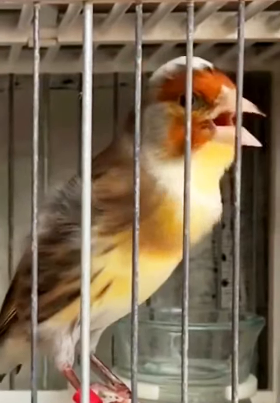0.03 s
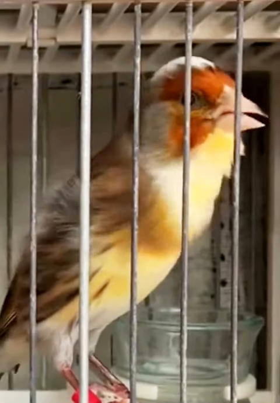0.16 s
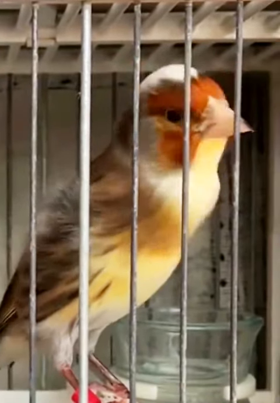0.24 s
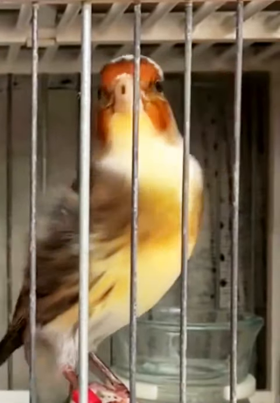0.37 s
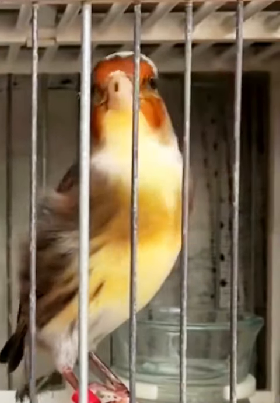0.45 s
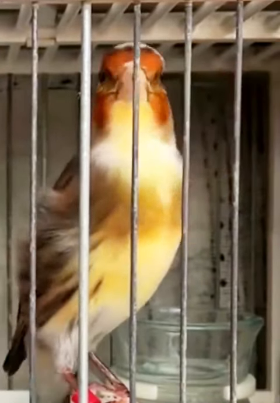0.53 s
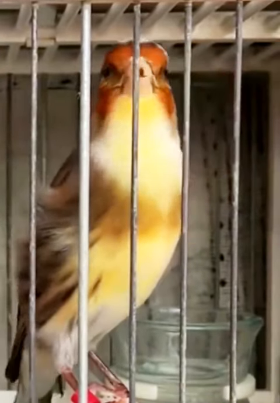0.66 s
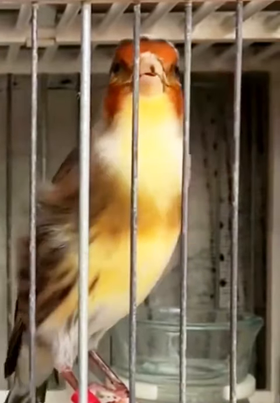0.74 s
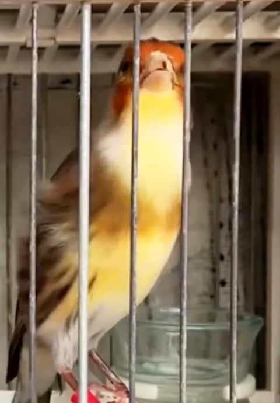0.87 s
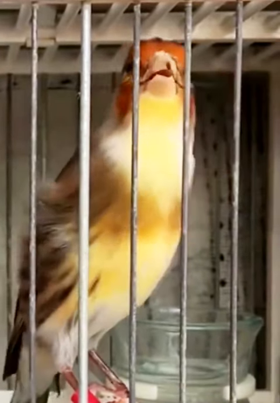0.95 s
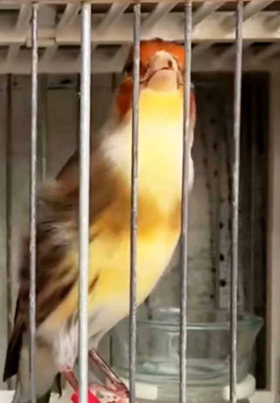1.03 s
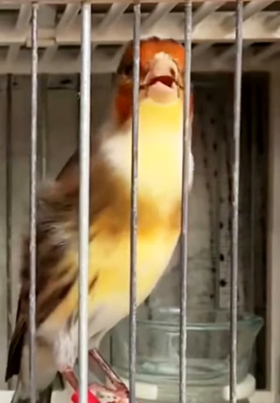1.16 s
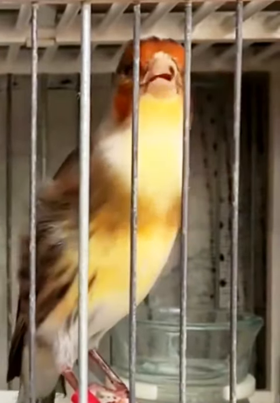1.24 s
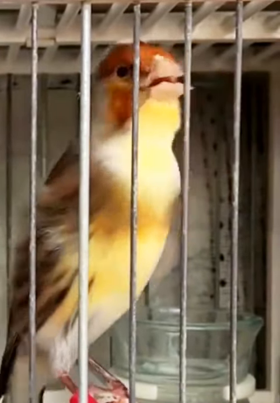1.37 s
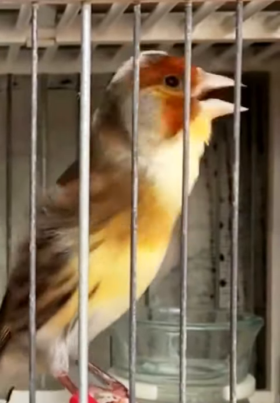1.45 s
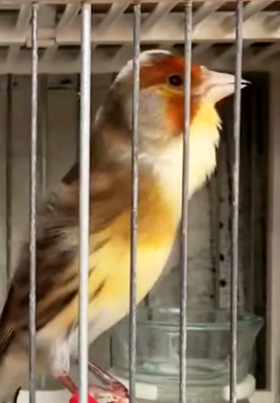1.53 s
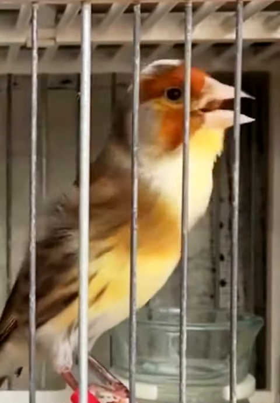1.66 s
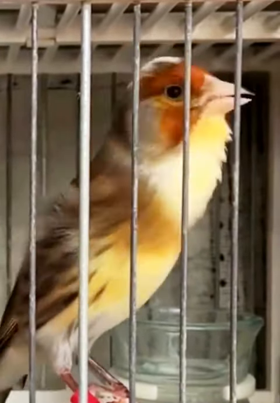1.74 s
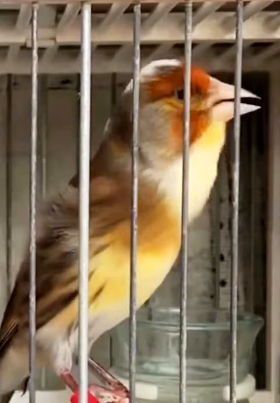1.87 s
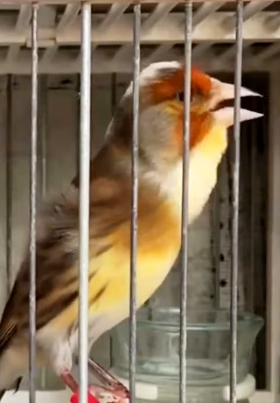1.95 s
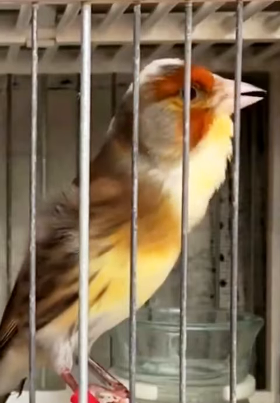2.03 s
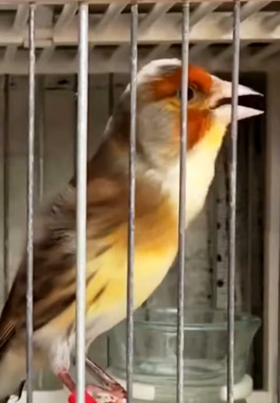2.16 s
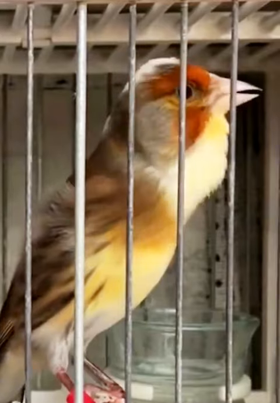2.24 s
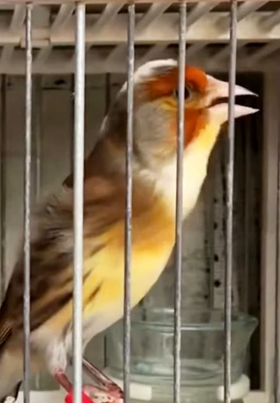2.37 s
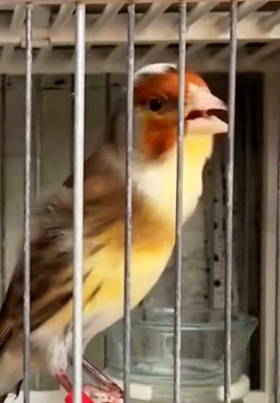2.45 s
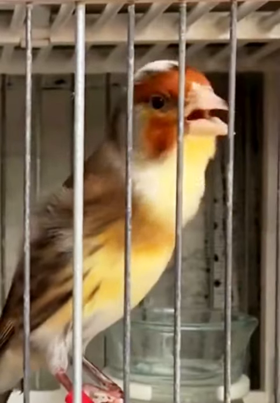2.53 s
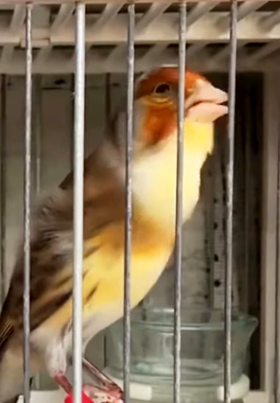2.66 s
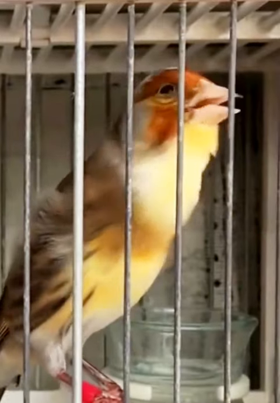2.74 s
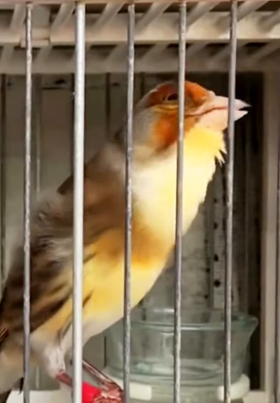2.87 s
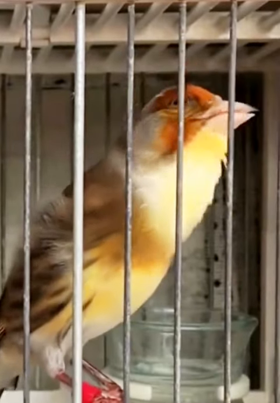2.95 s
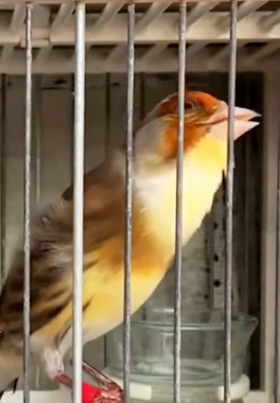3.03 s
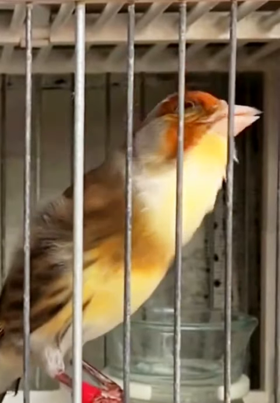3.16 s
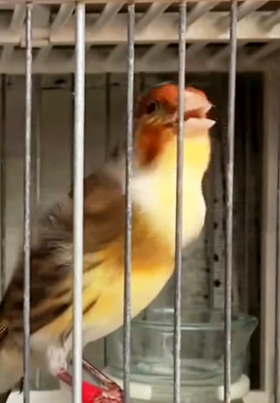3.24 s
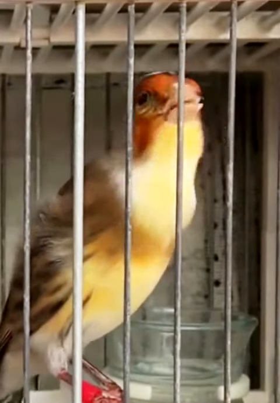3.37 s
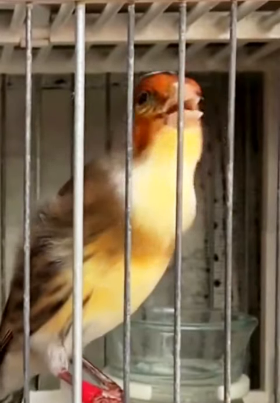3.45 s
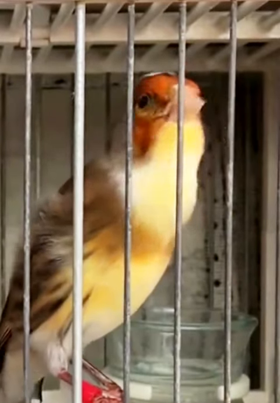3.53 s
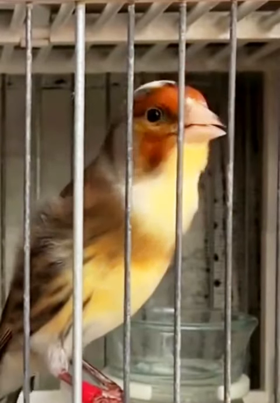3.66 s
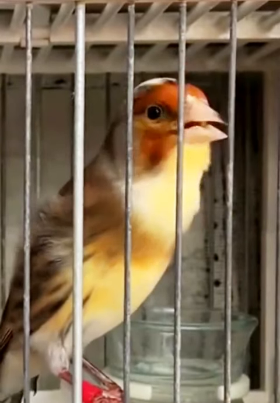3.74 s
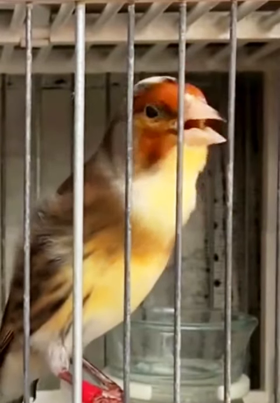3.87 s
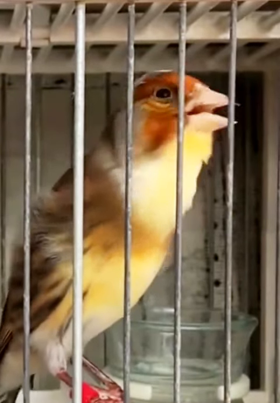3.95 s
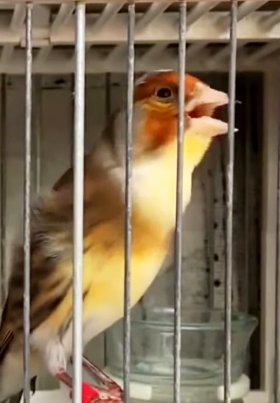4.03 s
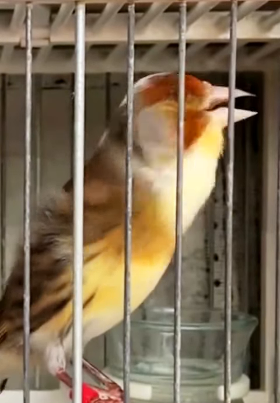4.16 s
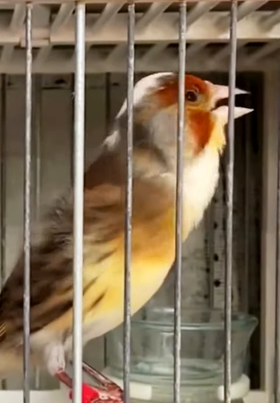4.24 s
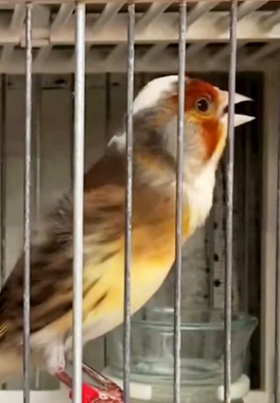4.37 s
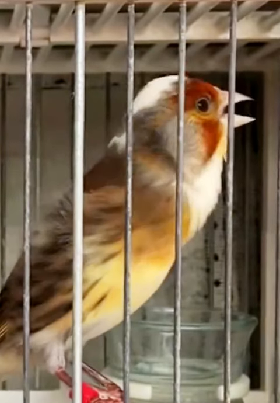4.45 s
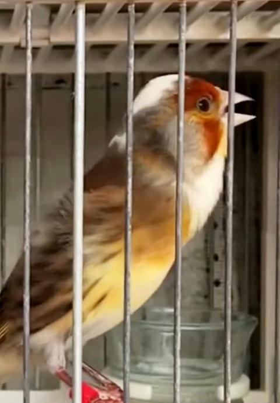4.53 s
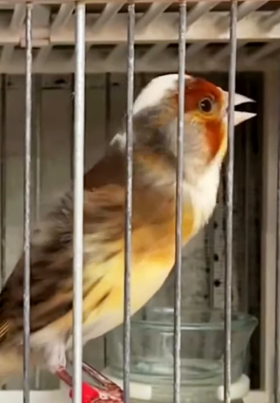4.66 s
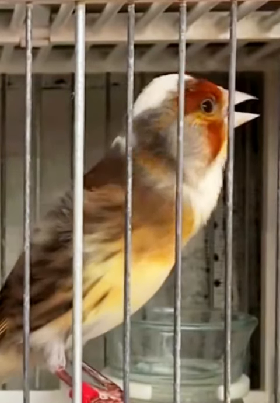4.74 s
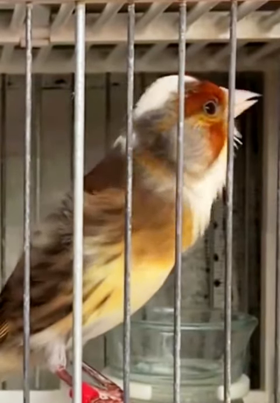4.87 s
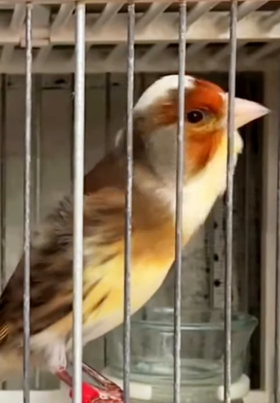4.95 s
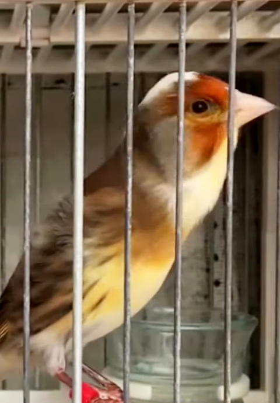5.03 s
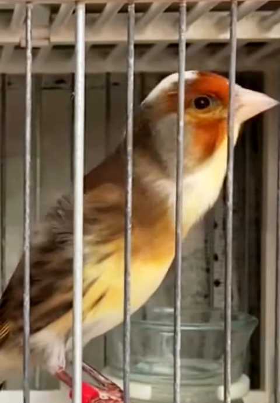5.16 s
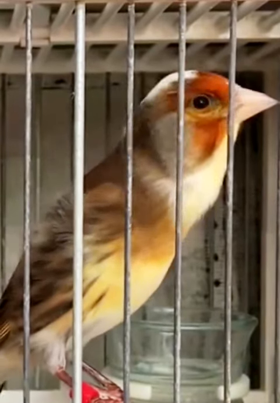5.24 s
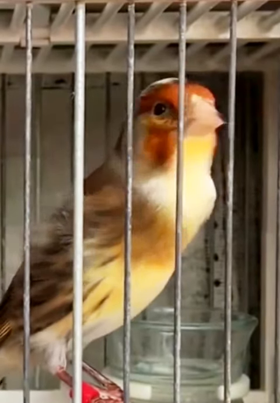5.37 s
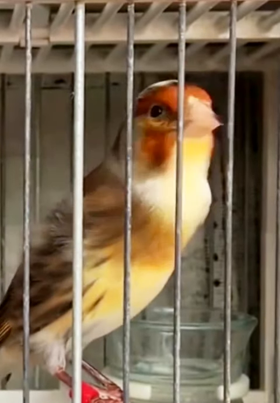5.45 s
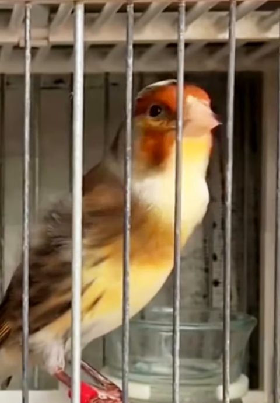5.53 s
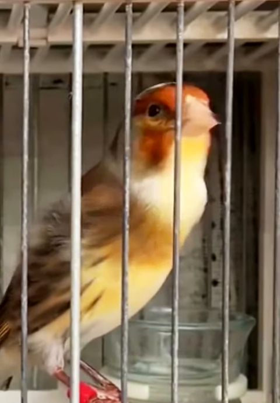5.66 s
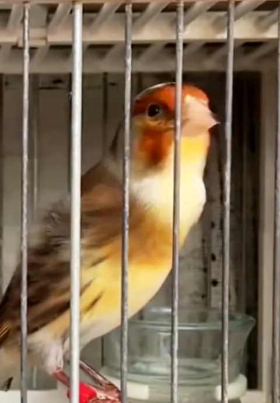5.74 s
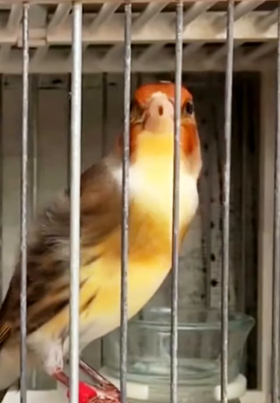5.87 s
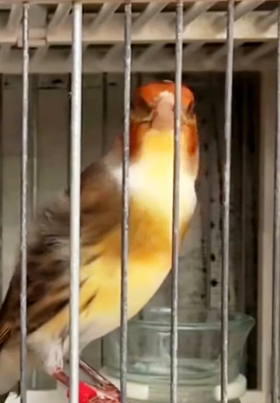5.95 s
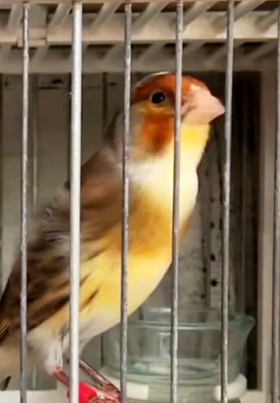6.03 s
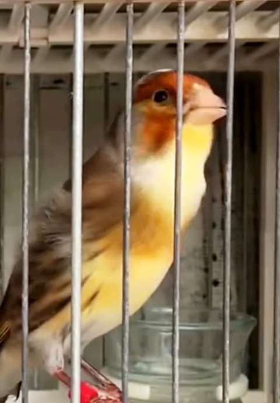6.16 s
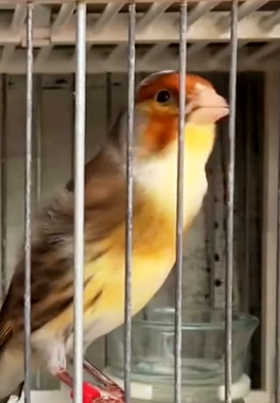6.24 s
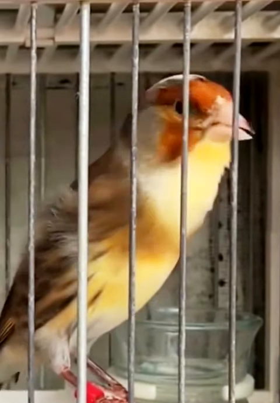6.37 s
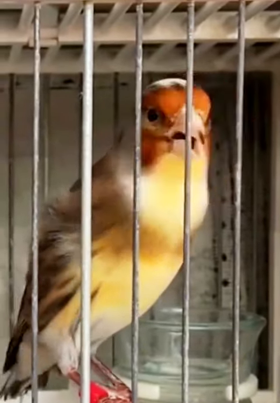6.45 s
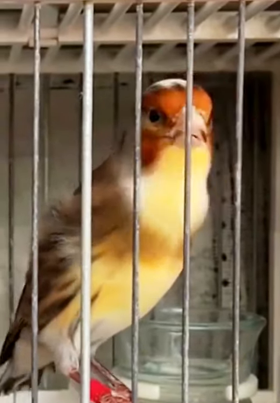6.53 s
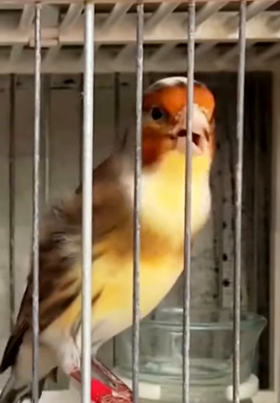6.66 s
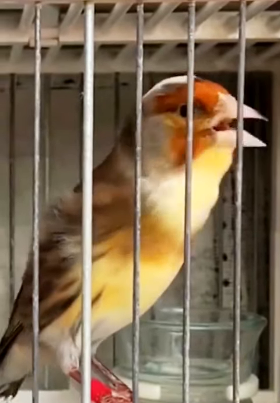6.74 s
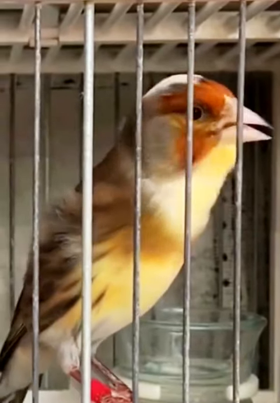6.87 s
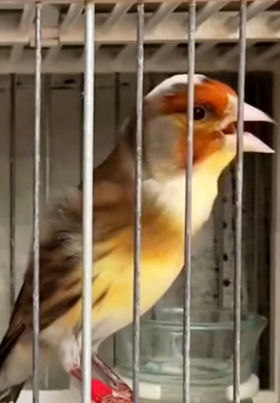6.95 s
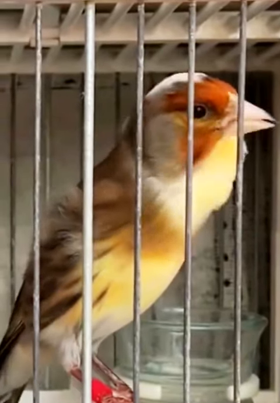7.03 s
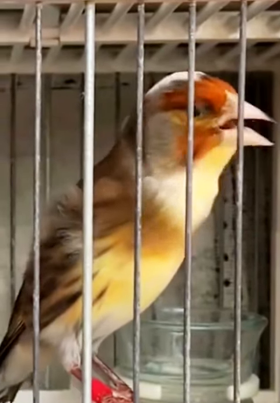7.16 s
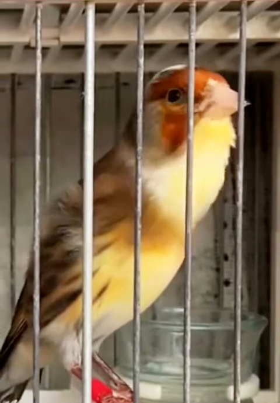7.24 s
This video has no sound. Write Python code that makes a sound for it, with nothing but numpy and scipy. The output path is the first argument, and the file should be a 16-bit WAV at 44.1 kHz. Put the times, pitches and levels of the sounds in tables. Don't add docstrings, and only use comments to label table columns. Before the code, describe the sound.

A small finch sings loudly and very close to the microphone in a small hard room. Short clear whistles with tiny high chirps repeat about five times a second, drop in pitch and flutter, then turn into faster chips and sharp downward sweeps. A falling throbbing buzz ends the phrase. After over a second of near quiet with faint distant chirps, the whistled song starts again. Low air rumble and thin hush lie beneath.

```python
import sys
import numpy as np
from scipy import signal
from scipy.fft import rfft, irfft, next_fast_len
from scipy.io import wavfile
from scipy.ndimage import uniform_filter1d

SR = 44100
rng = np.random.default_rng(int(sys.argv[2]) if len(sys.argv) > 2 else 0)


def voltage_ratio(level):
    return 10 ** (np.asarray(level, float) / 20)


def store_pcm(level_fs):
    pcm = np.round(np.clip(level_fs, -1, 1) * 32767).astype(np.int16)
    wavfile.write(sys.argv[1], SR, np.atleast_2d(pcm).T)


N = 321930
T = np.arange(N) / SR

# [f/Hz, density/dB]
RUMBLE = [(20, -31), (45, -5), (80, 0), (200, -8), (400, -22), (800, -37)]
# [t/s, peak level/dB]
PUFFS = [(.8, -47), (.98, -44), (1.118, -41), (1.209, -38), (1.599, -48), (1.779, -35), (1.869, -44.5),
         (2.079, -41), (2.279, -45), (2.43, -40), (2.54, -45.5), (2.899, -47), (5.29, -43), (5.65, -51),
         (5.95, -47.5), (6.5, -35), (6.6, -40.5), (6.708, -37), (7.18, -49)]
# [f/Hz, density/dB]
ROOM_HUSH = [(150, -11.5), (300, -10), (500, -18.5), (2300, -23), (3800, -15), (5900, -24.5), (6600, -35),
             (15500, -39.5)]
# [t/s, width/s, sinking/dB]
DUCKS = [
    (5.17, 0.2, 5),
    (5.92, .1, 2.5),
]
# [t/s, length/s, first f/Hz, last f/Hz, rms level/dB]
FAR_COOS = [
    (0.034, .73, 1289, 1418, -56),
    (0.05, .5, 2000, 2120, -65),
    (0.057, .46, 1630, 1640, -57.5),
    (5.403, .05, 3760, 3600, -44),
    (5.78, .08, 3350, 2800, -51),
    (6.951, .3, 514, 618, -58),
    (6.98, .3, 590, 560, -59),
    (4.6, .25, 510, 500, -65),
]
FAR_CHATTER = [
    (0.633, .082, 3630, 2600, -48.5),
    (5.432, .1, 3400, 3020, -45),
    (5.58, .075, 4100, 2900, -55),
    (6.14, .14, 3424, 2780, -46.5),
    (4.87, .09, 2900, 2800, -52),
    (4.08, .11, 3100, 2900, -49),
]

# [low f/Hz, high f/Hz]
HAZE_BANDS = [(2500, 4100), (4100, 6400)]
# [low f/Hz, whistle f/Hz, whistle share 0-1]
REBUILT_BANDS = [(6400, 6718, .1), (7200, 7655, .1), (8000, 8442, .1), (8900, 9474, 0), (10300, 11455, .1),
                 (12060, 12576, .1), (13100, 13609, .2), (14200, 14600, .05), (14900, 15331, .3)]
REBUILT_DB = [-6, -2.5, -10.5, -12, 2, -3, 3.5, 6, 4.5]
# [order, low f/Hz, high f/Hz]
OVERTONES = [(2, 6400, 7000), (2, 7000, 9200), (2, 9400, 12300), (2, 12300, 15600), (3, 13500, 15600),
             (4, 12700, 14000), (3, 8500, 9900), (3, 12100, 13300)]
OVERTONE_DB = [-42, -30, -24, -24, -24.5, -36, -33, -37]
# [from t/s, to t/s, f/Hz, level/dB]
HANGING = [
    (3.77, 4.57, 12576, -27),
    (1.77, 2.42, 15331, -28),
    (3.77, 4.15, 8442, -33),
]

# [t/s, length/s, rms level/dB, whistle share 0-1]
HIGH = [(1.107, .02, -31.5, .41), (1.301, 0.043, -18.5, .89), (1.34, .016, -31, .97),
        (1.551, 0.026, -16.5, 0.94), (1.783, 0.02, -28.5, .05), (1.807, .04, -18, 0.95),
        (2.041, .02, -26.5, .13), (2.064, 0.027, -18.5, .83), (2.295, 0.017, -26, .05),
        (2.307, .035, -20, .48), (3.77, .024, -18.5, .39), (3.831, 0.02, -28, .05),
        (3.851, .023, -16.5, .41), (3.913, .021, -26, .05), (3.936, .029, -20, .05),
        (4.012, 0.021, -16.5, .3), (4.074, 0.024, -22, .33), (4.164, .027, -25, .18),
        (4.241, 0.03, -20, .52), (4.326, .026, -20.5, .18), (4.4, 0.017, -22.5, .21),
        (4.476, .03, -27, .59), (6.614, 0.022, -27.5, .73), (6.637, 0.03, -21.5, .71),
        (6.869, 0.041, -25.5, .95), (7.098, .047, -23.5, 0.97)]
HIGHEST = [
    (0.702, 0.014, -39, 0.2),
    (0.89, .022, -34.5, 0.54),
    (4.563, .059, -25, .5),
    (6.184, 0.01, -32.5, 0.33),
    (6.407, .022, -32.5, .23),
]
# [t/s, pitch f/Hz, rms level/dB, throb f/Hz, throb depth 0-1]
BUZZ = [
    (4.647, 5606, -24, 185.7, 0.6),
    (4.685, 5000, -16.5, 198.6, 0.32),
    (4.705, 4550, -12.5, 203.1, 0.05),
    (4.73, 4388, -14.5, 206.5, 0.2),
    (4.741, 4298, -27.5, 148, 0.56),
    (4.748, 3883, -20, 128.9, 0.4),
    (4.81, 3052, -19.5, 139.2, 0.46),
    (4.87, 2624, -27, 150.4, 0.77),
    (4.89, 2330, -46, 162, 0.05),
]

# [t/s, length/s, settled f/Hz, level near the end/dB, lead-in level/dB]
WHISTLES = [(0.547, 0.065, 4312, -7.5, -18), (0.749, 0.069, 4245, -3.5, -17.5),
            (0.958, 0.076, 4260, -2.5, -17), (1.158, 0.081, 4043, -3.5, -19.5),
            (1.395, 0.092, 3854, -10.5, -14.5), (6.243, 0.087, 4288, -4.5, -17.5),
            (6.481, 0.073, 4267, -2, -13), (6.7, 0.11, 3917, -14.5, -9.5), (6.95, 0.093, 3914, -16, -8.5)]
WARBLES = [(1.632, 0.1, 3560, -6.5, -19), (1.882, 0.095, 3560, -5.5, -22.5), (2.141, 0.1, 3538, -8, -19.5),
           (7.184, 0.093, 3552, -6.5, -18.5)]
SLIDES = [(3.118, 0.077, 4198, -3.5, -11.5), (3.282, 0.097, 4193, -4, -16), (3.472, 0.08, 4224, -5, -17),
          (3.65, 0.086, 4240, -5.5, -18.5)]
HOOTS = [(3.058, 0.053, 3566, -7.5, -23.5), (3.218, 0.042, 3387, -6, -21),
         (3.405, 0.047, 3380, -5.5, -25.5), (3.584, 0.045, 3376, -6.5, -21)]
DROPS = [(2.434, 0.039, 4783, -8.5, -22), (2.523, .034, 4760, -7, -22), (2.611, .040, 4703, -7, -22),
         (2.697, 0.039, 4635, -5, -22), (2.785, .036, 4795, -5, -22), (2.879, .034, 4804, -6, -22),
         (2.976, .044, 4930, -7, -22)]
CRACKS = [(4.091, .024, 4900, -11.5, -20), (4.180, .022, 4900, -7.5, -20), (4.259, .021, 4810, -8.5, -20),
          (4.331, .021, 4880, -7.5, -20), (4.403, .024, 4916, -7.5, -19.5), (4.490, .02, 4890, -11.5, -20)]
# (first f/Hz, f/Hz where the lead-in hands over, glide share of the length,
# overlap/s, attack/s, growth/dB, release/s)
WHISTLE, WARBLE = (2900, 3763, .26, .0067, .013, 4.5, .0082), (2780, 3140, .26, .018, .025, 12, .0074)
SLIDE, HOOT = (5355, 4890, .24, .014, .018, 1, .012), (2400, 2825, .42, .002, .021, .6, .01)
DROP, CRACK = (5950, 5350, .32, .15, .004, -4, .009), (6500, 5900, .5, .24, .0025, -12.5, .008)

# [t/s, length/s, last f/Hz, peak level/dB]
FLICKS = [(0.637, .018, 6240, -22.5), (0.835, .021, 6220, -22.5), (1.047, .023, 6030, -16),
          (1.769, .006, 5600, -12), (2.014, .007, 5600, -16), (2.269, .008, 5600, -17),
          (6.112, .016, 6180, -20), (6.348, .019, 5984, -19), (6.57, .017, 6090, -16.5)]
CHIRPS = [(1.267, .0051, 5300, -7), (1.505, .0064, 5430, -5), (6.827, .008, 5406, -8.5),
          (7.064, .009, 5440, -9), (7.296, .008, 4897, -6)]
TAPS = [(1.764, 0.004, 4300, -5), (2.009, 0.005, 4233, -5), (2.265, 0.0037, 4360, -3),
        (3.021, 0.013, 4400, -15)]
SWOOPS = [(0.711, 0.023, 5830, -14.5), (0.911, 0.029, 5730, -16.5), (1.12, 0.031, 5620, -8.5),
          (1.339, 0.021, 5205, -2.5), (1.568, 0.035, 5053, -6.5), (1.836, 0.029, 4863, -6.5),
          (2.089, 0.029, 4925, -4), (2.343, 0.026, 4956, -5), (6.195, 0.025, 5830, -15),
          (6.424, 0.028, 5696, -11.5), (6.66, 0.022, 5324, -6), (6.897, 0.038, 5077, -4.5),
          (7.131, 0.032, 5040, -5.5)]
DIPS = [(2.402, 0.005, 2750, -8), (2.49, 0.006, 2600, -11), (2.578, 0.006, 2690, -12),
        (2.666, 0.005, 2800, -9), (2.755, 0.006, 2550, -14.5), (2.844, .006, 2747, -12),
        (2.938, 0.008, 2614, -16)]
LIFTS = [(-.028, .1, 3738, -5.5), (2.418, .015, 3700, -5.5), (2.505, 0.017, 3740, -9),
         (2.594, 0.017, 3706, -9.5), (2.679, .013, 3807, -11), (2.771, 0.0079, 3745, -9.5),
         (2.859, .021, 3736, -7.5), (2.957, .021, 3700, -5.5)]
OPENERS = [(6.068, 0.019, 4240, -8.5)]
SWEEPS = [(3.778, .024, 4980, -5.5), (3.856, .025, 4910, -5.5), (3.946, .022, 4900, -6.5),
          (4.016, .026, 4910, -6)]
PIPS = [(-.006, .016, 4400, -11.5), (3.264, 0.011, 3490, -16), (3.455, 0.012, 3453, -17),
        (3.634, 0.01, 3497, -14.5), (3.805, 0.02, 4215, -2.5), (3.881, .023, 4178, -4),
        (3.97, 0.019, 4182, -3), (4.045, 0.022, 4217, -6), (4.121, .026, 4203, -11.5),
        (4.206, .024, 4184, -11.5), (4.284, 0.032, 4173, -16), (4.356, .027, 4167, -14.5),
        (4.432, 0.032, 4153, -17.5), (4.511, 0.042, 4190, -18.5), (4.57, .07, 4190, -34),
        (6.8, .13, 3920, -33), (7.018, .014, 4023, -12)]
FLICK, CHIRP, TAP = (4348.5, 4.5, 1.16, -2.5, .62), (4326.5, .58, 1.68, 2.5, 1.25), (4747, 2.5, 1.5, -4.5, 1.3)
SWOOP, DIP, LIFT = (6980, 5.5, 1.51, 270, 1.37), (3649, 3, 1.36, 0, .7), (3090, 2.3, 1.17, .5, 1.05)
SWEEP, PIP, OPENER = (6760, 3, 1.15, .99, .85), (None, 1.1, 1.05, 0, .94), (3749, 3, .9, 0, 1.1)

FRAME, FRAME_START = 2048, 807


def noise(shape):
    hz, db = np.transpose(shape)
    f = np.fft.rfftfreq(N, 1 / SR) + 1
    gain = voltage_ratio(np.interp(np.log(f), np.log(hz), db))
    x = irfft(rfft(rng.standard_normal(N)) * gain, N)
    return x / x.std()


def band(x, lo_hz, hi_hz):
    return signal.sosfiltfilt(signal.butter(4, [lo_hz, hi_hz], "band", fs=SR, output="sos"), x)


def walk(rate, n=N):
    k = int(SR / rate)
    steps = np.repeat(rng.standard_normal(n // k + 1), k)
    return 1.3 * uniform_filter1d(uniform_filter1d(steps, k), k)[:n]


def span(start, length):
    at = slice(max(int(start * SR), 0), min(int((start + length) * SR), N))
    return at, np.clip((T[at] - start) / length, 0, 1)


def ramp(u):
    return np.sin(np.pi / 2 * np.clip(u, 0, 1)) ** 2


def tone(hz):
    return np.exp(2j * np.pi * np.cumsum(hz) / SR)


def hiss(hz, width_hz):
    slow = walk(width_hz, len(hz)) + 1j * walk(width_hz, len(hz))
    return (slow * tone(hz)).real / np.std(slow.real)


def hold(power, size):
    first = size - FRAME_START % size
    blocks = np.pad(power, (first, size - (N + first) % size)).reshape(-1, size)
    cells = np.repeat(blocks.mean(axis=1), size)
    return uniform_filter1d(cells[first:first + N], size=90) + 1e-14


def patchy(x, spread_db):
    _, _, cells = signal.stft(x, nperseg=1024)
    chance = rng.standard_normal((cells.shape[0] // 8 + 1, cells.shape[1]))
    error_db = spread_db * np.repeat(chance, 8, axis=0)[:len(cells)]
    return signal.istft(cells * voltage_ratio(error_db), nperseg=1024)[1][:N]


def air_on_port(calm):
    gusts = voltage_ratio(-59) + sum(voltage_ratio(db) * np.exp(-((T - s) / .045) ** 2) for s, db in PUFFS)
    rumble = band(noise(RUMBLE), 25, 710) * gusts * calm * voltage_ratio(3.2 * walk(25))
    hum = calm * voltage_ratio(-48.5 + 1.7 * walk(3.6)) * hiss(np.full(N, 70), 79)
    return rumble + hum


def room_hush(calm):
    hush = noise(ROOM_HUSH) * voltage_ratio(-54.5 + walk(3)) * calm ** .3
    sunk = voltage_ratio(-sum(db * np.exp(-((T - s) / w) ** 2) for s, w, db in DUCKS))
    return hush + (sunk - 1) * band(hush, 1800, 15000)


def far_birds():
    out = np.zeros(N)
    for calls, width in [(FAR_COOS, .08), (FAR_CHATTER, .45)]:
        for start, length, hz0, hz1, db in calls:
            at, u = span(start, length)
            swell = np.abs(np.sin(np.pi * u ** .7)) ** .6
            out[at] += voltage_ratio(db) * swell * hiss(hz0 + (hz1 - hz0) * u, width * hz1)
    return out


def perch_tick():
    out = np.zeros(N)
    at, u = span(5.664, .035)
    out[at] = voltage_ratio(-42) * np.hanning(len(u)) * band(rng.standard_normal(len(u)), 3300, 15500)
    return out


def background():
    calm = voltage_ratio(-5.5 * np.exp(-((T - 3.8) / .69) ** 2))
    return air_on_port(calm) + perch_tick() + patchy(room_hush(calm) + far_birds(), spread_db=3.5)


def echo(x, t60=.45):
    t = np.arange(SR // 2) / SR
    walls = 0
    for decay_s, db in [(t60, -28), (.084, -18.5)]:
        tail = rng.standard_normal(len(t)) * (t > .003) * np.exp(-np.log(1000) * t / decay_s)
        walls = walls + voltage_ratio(db) * tail / np.linalg.norm(tail)
    return signal.fftconvolve(x, walls)[:N]


def haze(x, lo_hz, hi_hz):
    size = uniform_filter1d(np.abs(band(x, lo_hz, hi_hz)), size=130)
    change = np.abs(size - np.roll(size, shift=130))
    spread = np.sqrt(hold(change ** 2, size=FRAME))
    change = voltage_ratio(-6.5) * uniform_filter1d(change, size=1200) + voltage_ratio(-8.5) * spread
    fill = band(rng.standard_normal(N), lo_hz, hi_hz)
    return (voltage_ratio(-50.5) * uniform_filter1d(size, size=1500) + voltage_ratio(-19.01) * change) * fill / fill.std()


def reflect_and_haze(x):
    return x + patchy(echo(x) + sum(haze(x, *edges) for edges in HAZE_BANDS), spread_db=6.5)


def link_treble(low, overtones, size):
    out, white = np.zeros(N), rng.standard_normal(N)
    turning = signal.hilbert(band(low, 880, 6500), next_fast_len(N))[:N]
    copies = [(turning * np.exp(2j * np.pi * up_hz * T)).real for up_hz in (5512.5, 9646.9)]
    limit = voltage_ratio(2 * -18) * hold(turning.real ** 2, size=512)
    tops = [b[0] for b in REBUILT_BANDS[1:]] + [15700]
    for (lo, hz, share), hi, db in zip(REBUILT_BANDS, tops, REBUILT_DB):
        part, fill, copy = (band(x, lo, hi) for x in (overtones, white, copies[lo > 12000]))
        lingering = voltage_ratio(2 * -14) * hold(part ** 2, size=FRAME)
        level = np.sqrt(hold(part ** 2, size=512) + lingering)
        whistle = np.sqrt(2 * share) * np.sin(2 * np.pi * hz * T)
        fill = np.sqrt(1 - share) * fill / fill.std() + whistle
        have = hold(copy ** 2, size=512)
        lack = np.sqrt(voltage_ratio(2 * -12) + limit / (have + limit))
        out += voltage_ratio(db) * level * (lack * fill + copy / np.sqrt(have + limit))
    effort = np.sqrt(hold(size ** 2, size=512) + voltage_ratio(-30) * hold(size ** 2, size=FRAME))
    for start, end, hz, db in HANGING:
        at, _ = span(start, end - start)
        out[at] += voltage_ratio(db) * effort[at] * np.sin(2 * np.pi * hz * T[at])
    return out


def voice_overtones(z, size):
    out = voltage_ratio(-62) * size * rng.standard_normal(N)
    for (order, lo, hi), db in zip(OVERTONES, OVERTONE_DB):
        out += voltage_ratio(db) * band((size * (z / size) ** order).real, lo, hi)
    return out


def high_notes():
    heard, sung = np.zeros(N), np.zeros(N, complex)
    notes = [(*n, 7460 - 676 * n[3], 6718) for n in HIGH] + [(*n, 7840, 8442) for n in HIGHEST]
    for start, length, db, share, hz, whistle_hz in notes:
        at, u = span(start - .001, length + .00067)
        gate = voltage_ratio(db) * signal.windows.tukey(len(u), .2)
        whistle = np.sqrt(2 * share) * np.sin(2 * np.pi * whistle_hz * T[at])
        heard[at] += gate * (whistle + np.sqrt(1 - share) * hiss(hz + 150 + 0 * u, 1500 - 700 * share))
        sung[at] += 1.4 * gate * tone(hz + 250 * walk(32, len(u)))
    return heard, sung


def buzz():
    s, *columns = np.transpose(BUZZ)
    at, _ = span(s[0], s[-1] - s[0])
    hz, db, rate, depth = (np.interp(T[at], s, c) for c in columns)
    n = len(hz)
    throb = tone(rate * (1 + .35 * walk(120, n)))
    level = 1.83 * voltage_ratio(db) * (1 + depth * throb.real) * voltage_ratio(1.9 * depth * walk(400, n))
    pitch = hz * (1 + depth * (.11 * throb.imag + .03 * walk(500, n)))
    rasp = voltage_ratio(db - 4.5) * depth * (1 + throb.real) * hiss(hz, 1300)
    z = np.zeros(N, complex)
    z[at] = (level * tone(pitch) + rasp) * signal.windows.tukey(n, .06)
    return z


def held(waver, notes, first_hz, hand_hz, glide, overlap_s, attack_s, growth_db, release_s, flutter=0):
    out = np.zeros(N, complex)
    power = 1.63
    for start, length, hz, db, lead_db in notes:
        at, u = span(start, length + .004)
        left = np.clip((hand_hz - hz) / (first_hz - hz), .05, .9)
        hand = glide * (-np.log(left)) ** (1 / power)
        lead = voltage_ratio(lead_db) * ramp(u / hand / .79) ** .7
        lead *= ramp(((hand - u) * length + overlap_s) / (overlap_s + .0039))
        full = voltage_ratio(db - growth_db * (.85 - u).clip(0) / (1 - hand))
        full *= ramp((u - hand) * length / attack_s) * ramp((1 - u) * length / release_s)
        pitch = hz + (first_hz - hz) * np.exp(-(u / glide) ** power)
        shut = ramp((1 - u) * length / .003)
        beat = 1 + flutter * (1 - .7 * u) * np.sin(2 * np.pi * 206 * T[at])
        out[at] += shut * (lead + full) * beat * tone(pitch * waver[at])
    return out


def quick(waver, notes, first_hz, settle, ease, hook_hz, late):
    out = np.zeros(N, complex)
    for start, length, hz, db in notes:
        at, u = span(start - .003, length + .0061)
        left = (np.exp(-settle * u ** ease) - np.exp(-settle)) / (1 - np.exp(-settle))
        pitch = hz + ((first_hz or hz) - hz) * left + hook_hz * u ** 6
        swell = np.abs(np.sin(np.pi * u ** late)) ** 1.25
        out[at] += voltage_ratio(db) * swell * tone(pitch * waver[at])
    return out


def finch():
    waver = 1 + .0025 * walk(150)
    z = held(waver, WARBLES, *WARBLE, flutter=.3)
    for notes, kind in [(WHISTLES, WHISTLE), (SLIDES, SLIDE), (HOOTS, HOOT), (DROPS, DROP), (CRACKS, CRACK)]:
        z += held(waver, notes, *kind)
    for notes, kind in [(FLICKS, FLICK), (CHIRPS, CHIRP), (TAPS, TAP), (SWOOPS, SWOOP), (DIPS, DIP),
                        (LIFTS, LIFT), (OPENERS, OPENER), (SWEEPS, SWEEP), (PIPS, PIP)]:
        z += quick(waver, notes, *kind)
    return z * voltage_ratio(.5 * walk(300))


def scene():
    heard, sung = high_notes()
    rasp = buzz()
    low = finch() + rasp
    z = low + sung
    size = np.abs(z) + 1e-6
    overtones = voice_overtones(z, size)
    octave = voltage_ratio(-27) * band((rasp * rasp / size).real * voltage_ratio(6 * walk(900)), 4400, 6400)
    near = reflect_and_haze(low.real + heard + octave) + background()
    return (near + link_treble(near, overtones + echo(overtones, t60=.2), size))[None]


def band_limit(x):
    return signal.sosfilt(signal.butter(12, 15780, fs=SR, output="sos"), x)


def record(dry):
    mix = np.clip(dry, -.995, .995)
    return band_limit(mix)


dry = scene()
out = record(dry)
store_pcm(out)
```